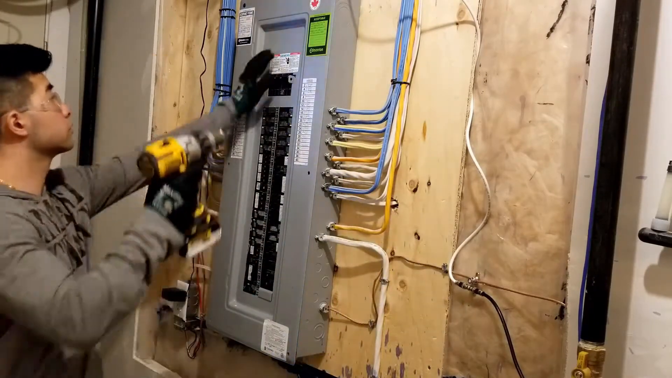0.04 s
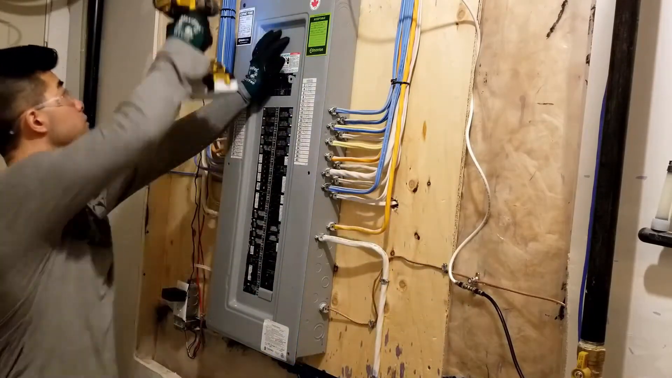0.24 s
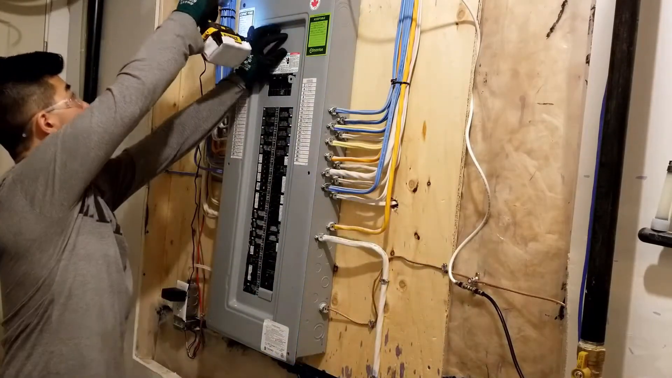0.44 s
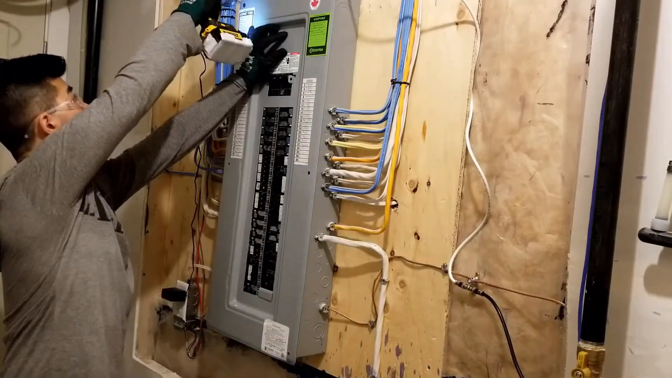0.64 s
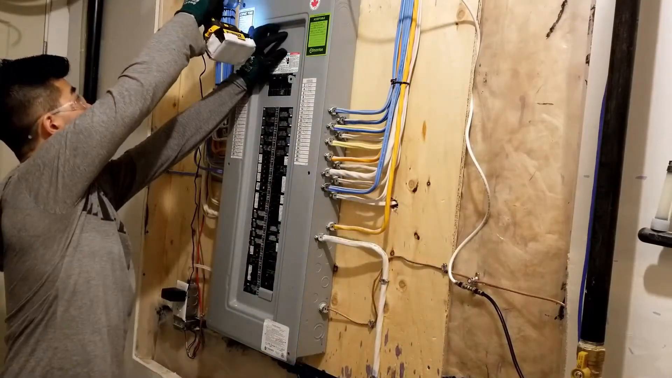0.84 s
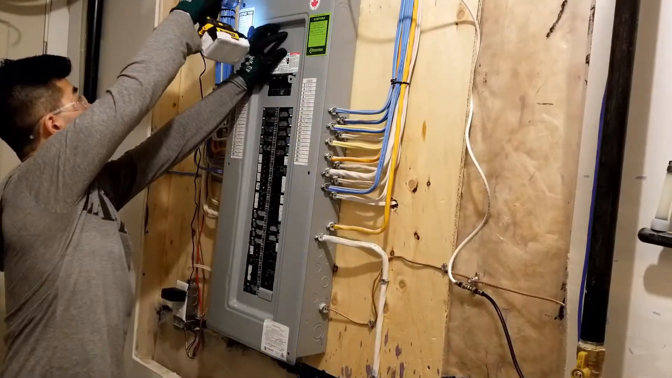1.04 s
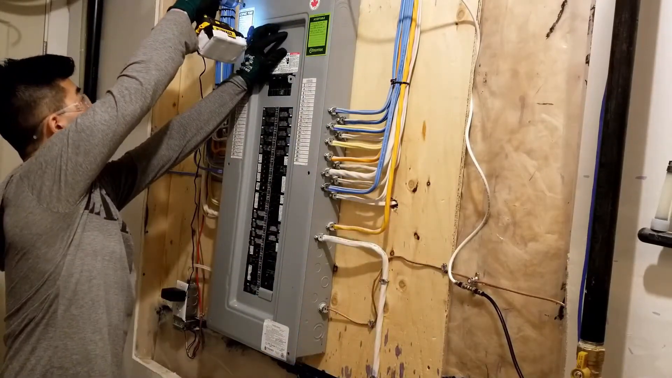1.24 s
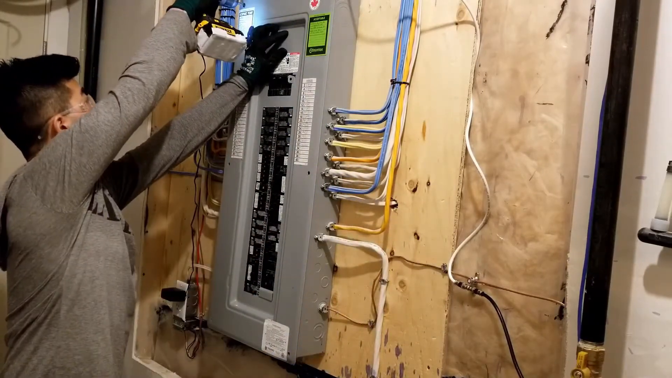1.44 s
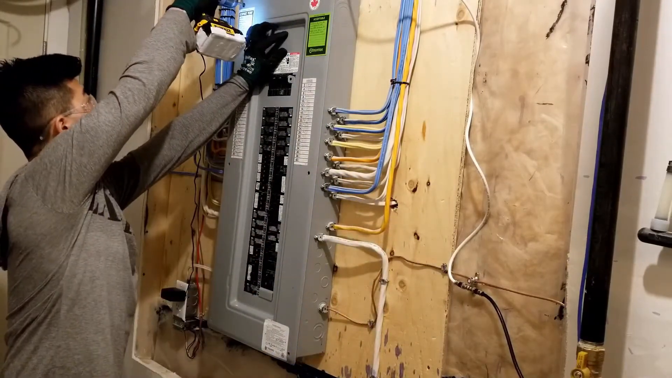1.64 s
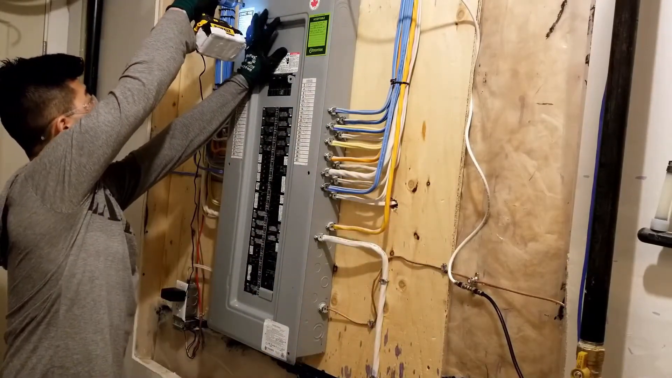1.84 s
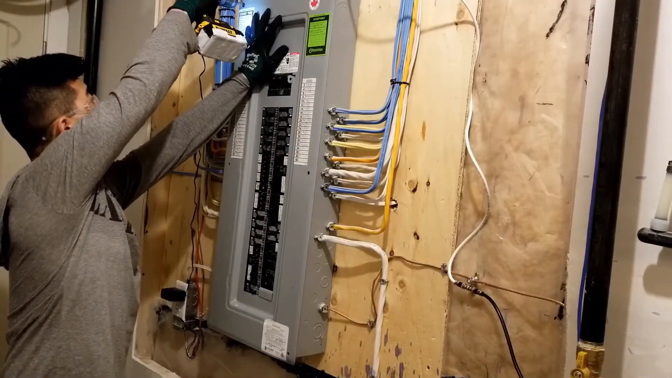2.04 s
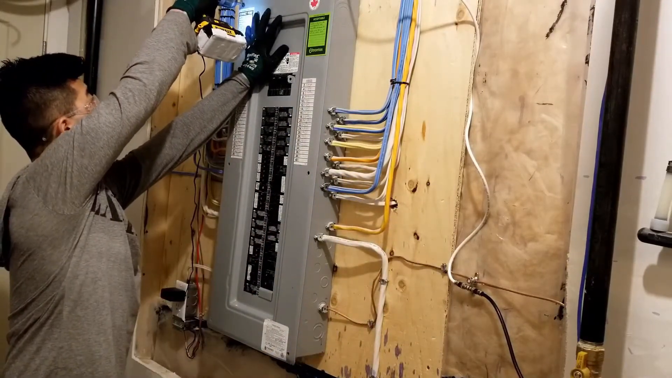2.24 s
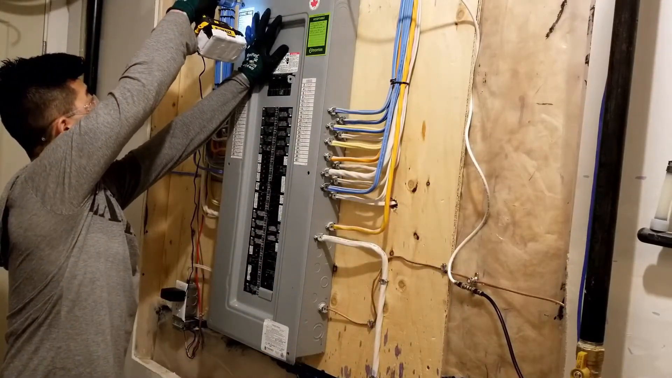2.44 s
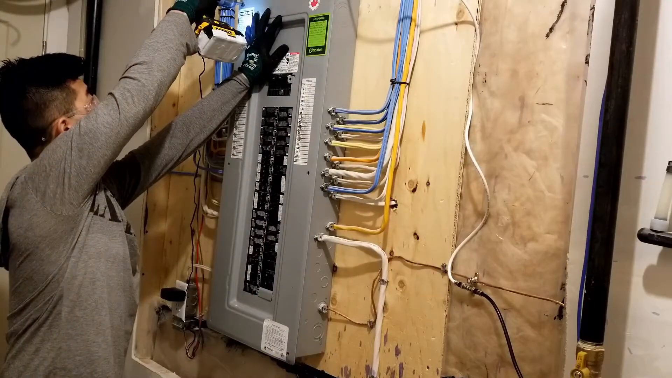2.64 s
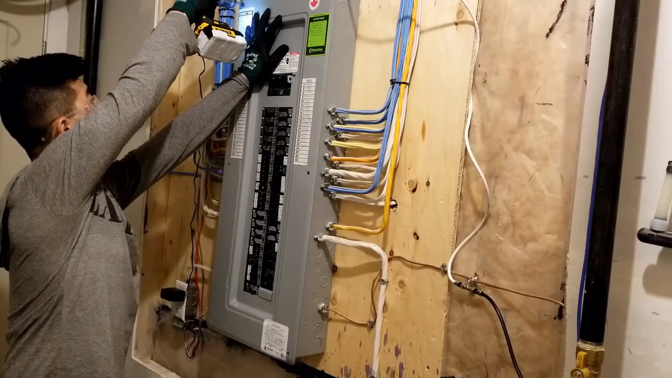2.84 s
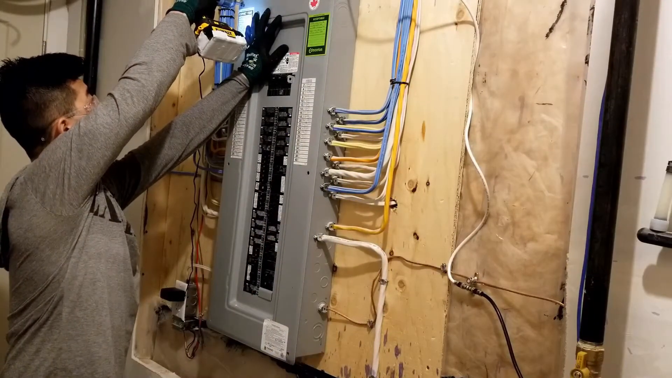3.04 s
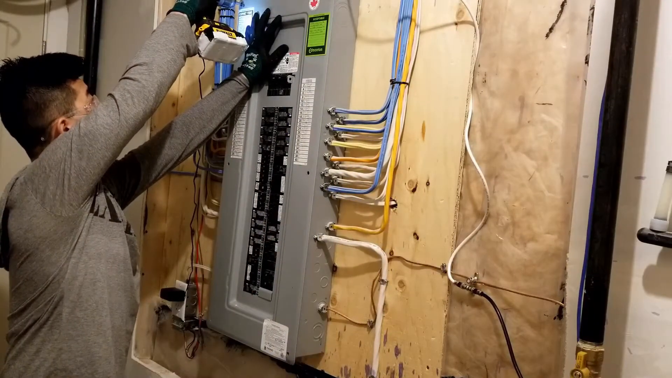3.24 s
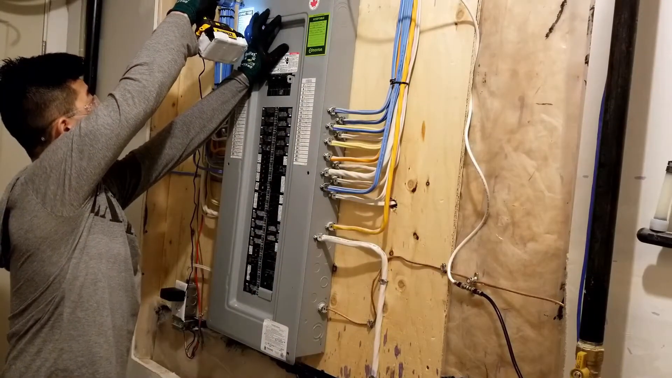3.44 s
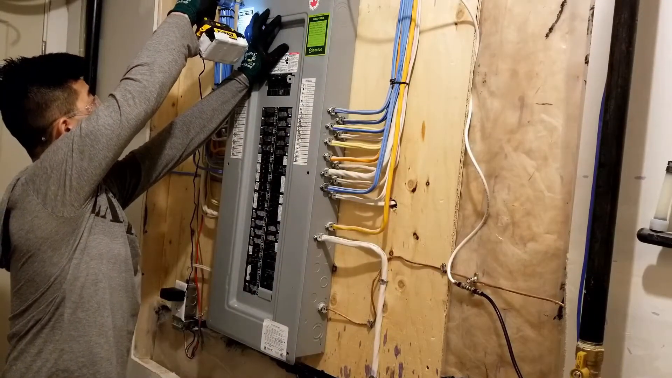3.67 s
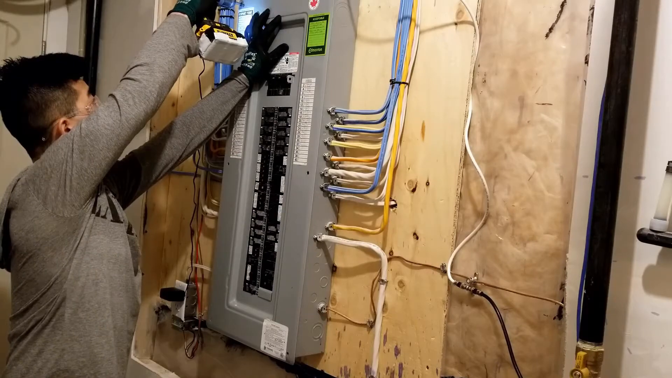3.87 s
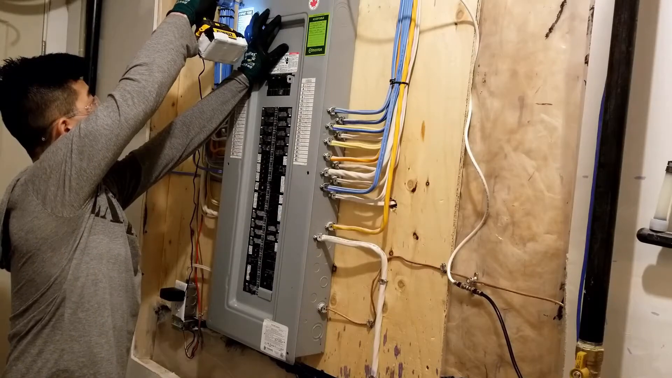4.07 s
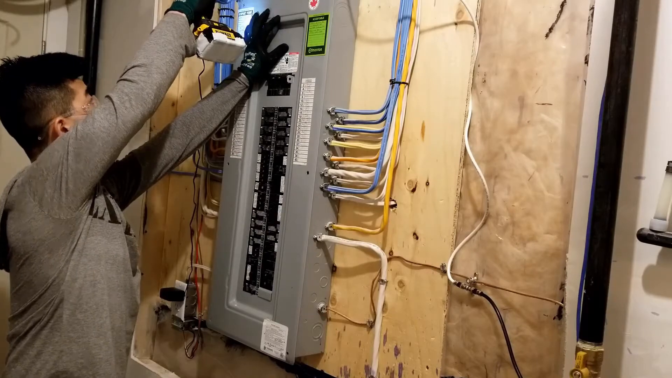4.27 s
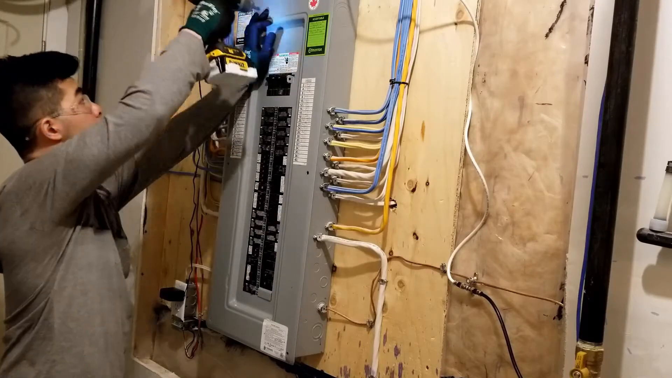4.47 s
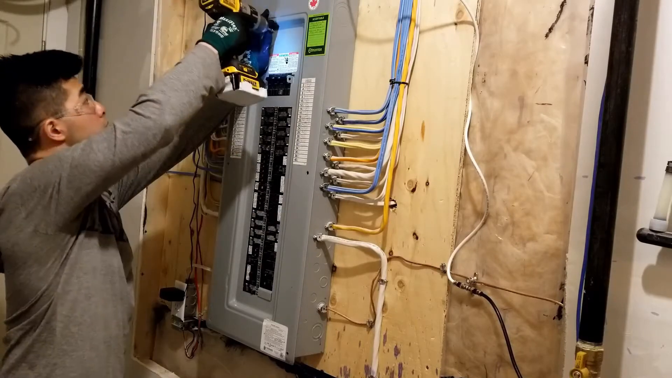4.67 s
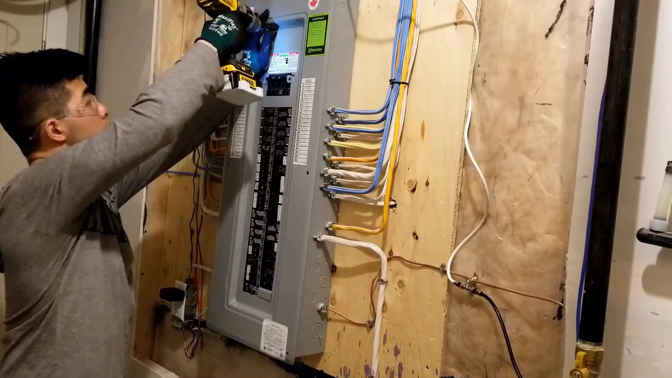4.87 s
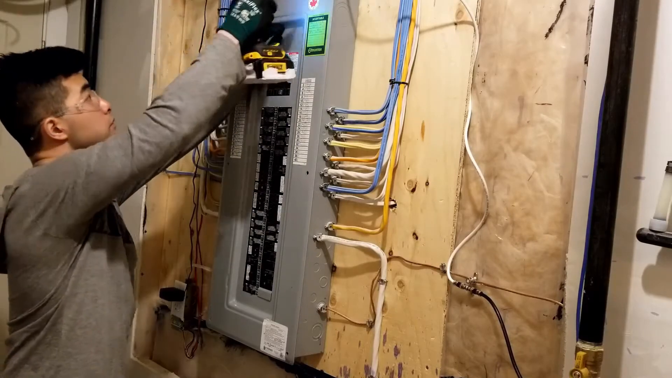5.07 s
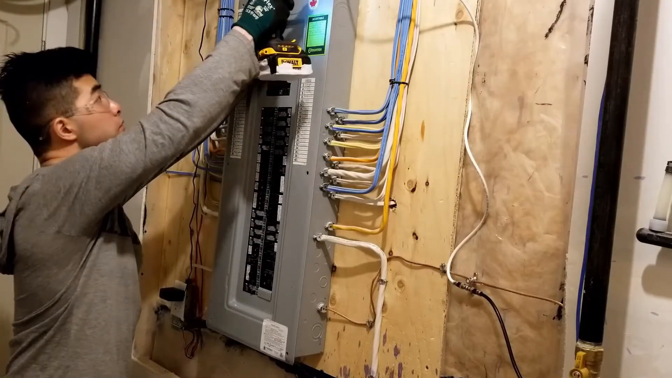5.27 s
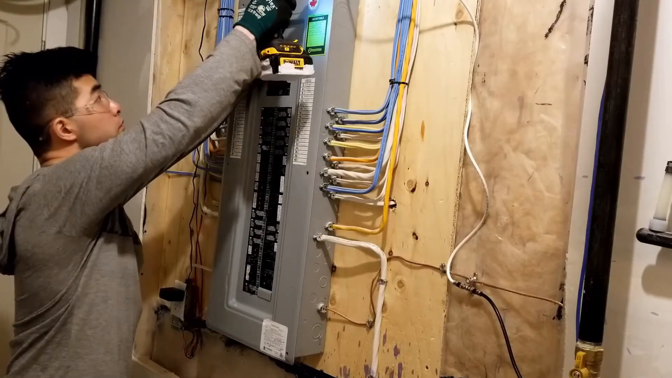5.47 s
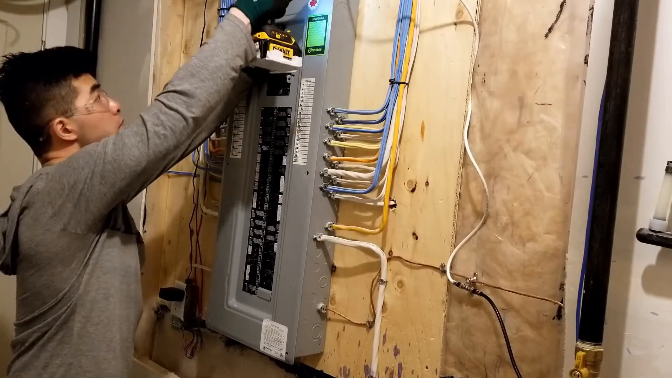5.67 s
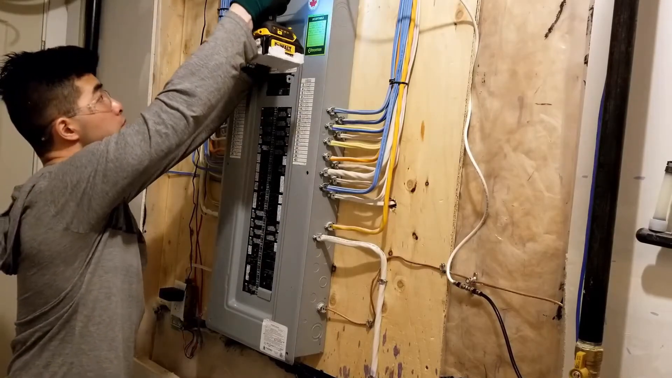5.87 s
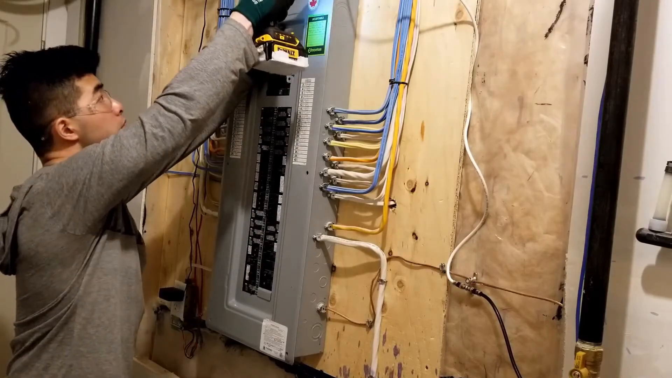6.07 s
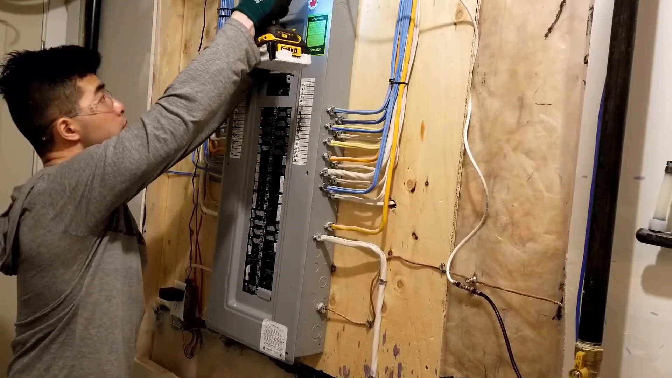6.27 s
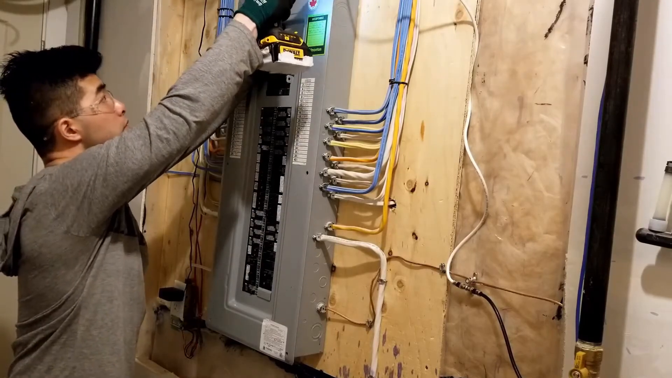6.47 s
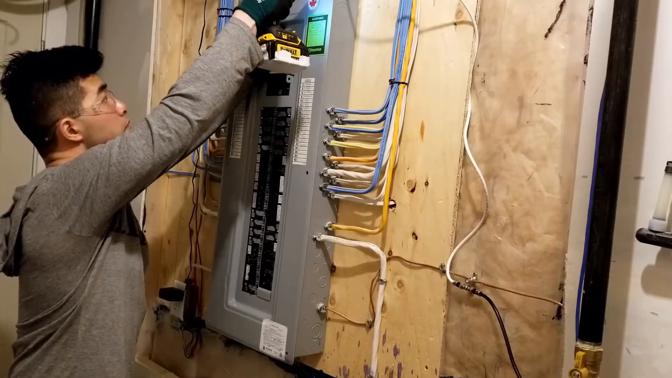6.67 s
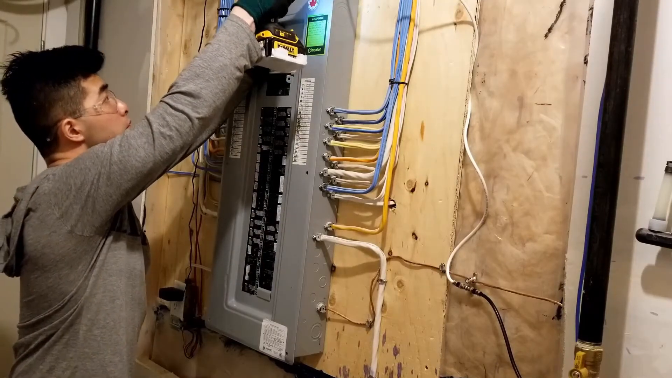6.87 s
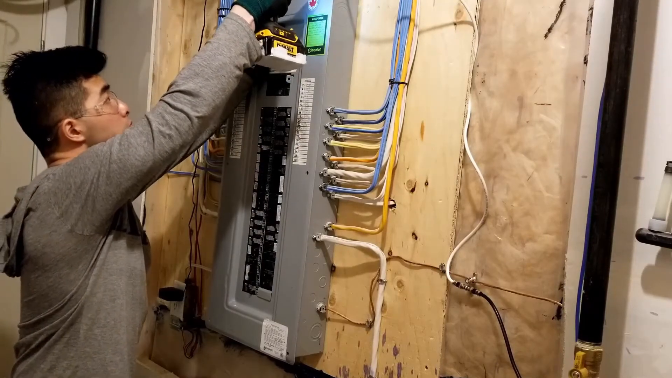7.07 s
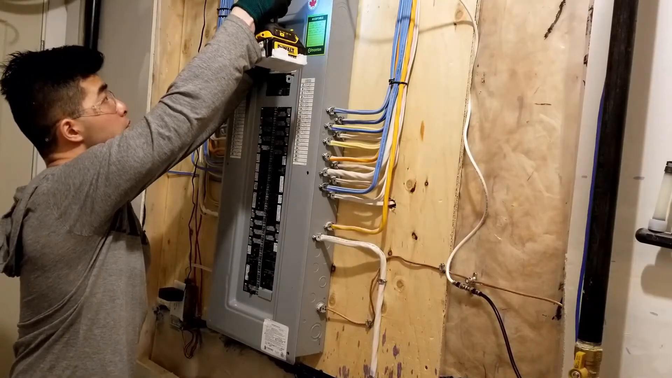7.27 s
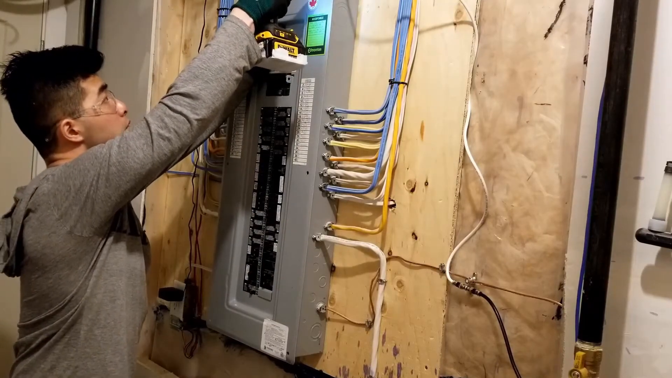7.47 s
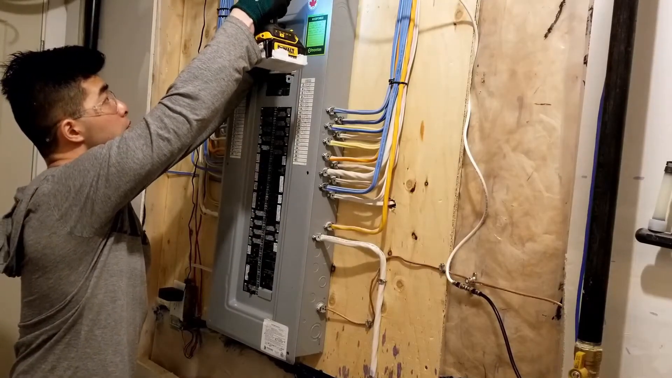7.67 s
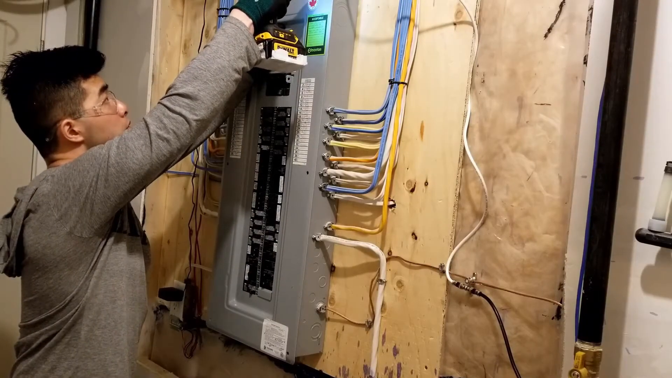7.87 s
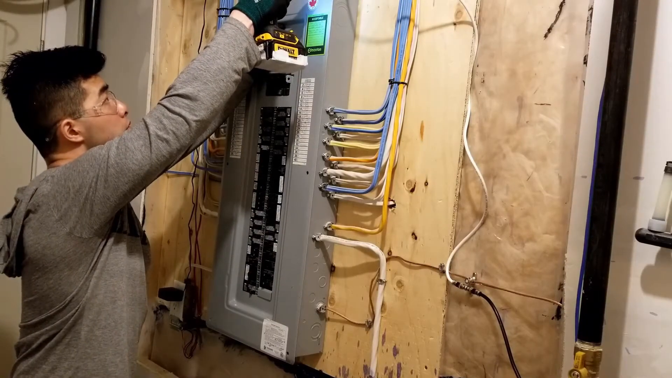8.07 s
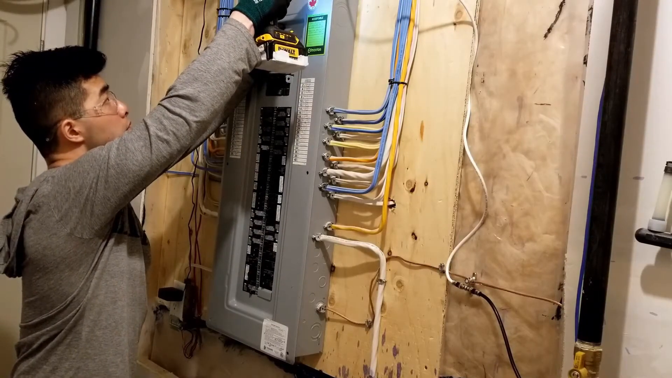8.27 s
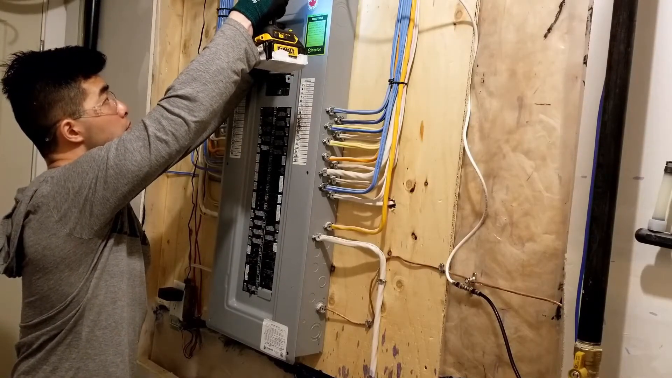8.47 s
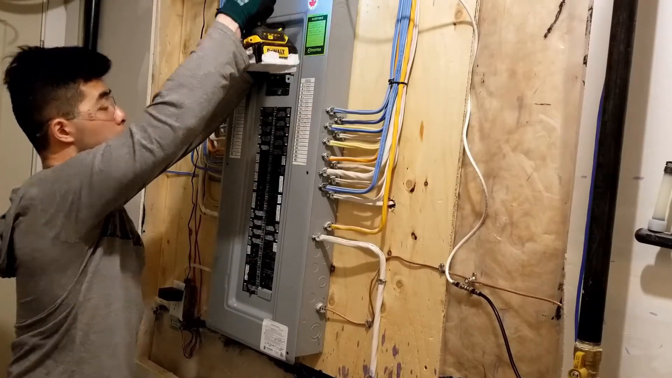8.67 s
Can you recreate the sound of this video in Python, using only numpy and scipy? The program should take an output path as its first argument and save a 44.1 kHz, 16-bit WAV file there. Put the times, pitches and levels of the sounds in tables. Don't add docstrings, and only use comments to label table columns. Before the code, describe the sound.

A cordless drill whirs in two long runs and three short blips against a sheet-metal panel cover, with knocks, rattles and soft footfalls indoors.

```python
import sys
import numpy as np
from scipy import signal
from scipy.fft import rfft, irfft, next_fast_len
from scipy.io import wavfile
from scipy.ndimage import uniform_filter1d

SR = 44100
rng = np.random.default_rng(int(sys.argv[2]) if len(sys.argv) > 2 else 0)


def decibels_to_gain(level_db):
    exponent = np.asarray(level_db, float) / 20
    return 10 ** exponent


def wav_out(sig):
    wavfile.write(sys.argv[1], SR, np.round(np.clip(np.atleast_2d(sig).T, -1, 1) * 32767).astype(np.int16))


N = 384111


def evened(x):
    return x / np.sqrt(np.mean(x ** 2) + 1e-20)


def read(points, hz):
    f, value = np.transpose(points)
    return np.interp(np.log(hz + 1), np.log(f + 1), value)


def add(mix, s, sound):
    part = mix[:, round(s * SR):][:, :sound.shape[1]]
    part += sound[:, :part.shape[1]]


def pair(size):
    likeness = 0.018
    a, b = rng.standard_normal((2, size))
    return np.array([a, likeness * a + np.sqrt(1 - likeness ** 2) * b])


def wander(size, hz):
    return evened(signal.lfilter(*signal.butter(2, hz, fs=SR), rng.standard_normal(size)))


def shape(x, gain):
    size = next_fast_len(x.shape[-1], True)
    spectrum = rfft(x, size) * gain(np.fft.rfftfreq(size, 1 / SR))
    return irfft(spectrum, size)[..., :x.shape[-1]]


def colour(x, spectrum):
    return evened(shape(x, lambda hz: decibels_to_gain(read(spectrum, hz))))


def ring(x, hz, width):
    return evened(shape(x, lambda f: 1 / (1 + (2 * (f - hz) / width) ** 2)))


def through(x, modes):
    return shape(x, lambda hz: sum(decibels_to_gain(db) / (1 + (2 * (hz - f) / w) ** 2) for f, w, db in modes))


def resonate(x, hz, width):
    turn = np.exp(2j * np.pi * np.cumsum(hz * np.ones(x.shape[-1])) / SR)
    r = np.exp(-np.pi * width / SR)
    low = signal.lfilter([1], np.convolve([1, -r], [1, -r]), x / turn)
    return evened((turn * low).real)


def whine(hz, width, clean=0.54):
    turn = 2 * np.pi * (np.cumsum(hz) / SR + rng.random((2, 1)) + 0.12 * wander(len(hz), 25))
    tone = np.sqrt(2) * np.cos(turn)
    return clean * tone + np.sqrt(1 - clean ** 2) * resonate(pair(len(hz)), hz, width)


def burst(t, t60, rise):
    u = t / max(t60, .03)
    return (1 - np.exp(-u / rise)) * decibels_to_gain(-60 * u ** 1.18)


# (frequency [Hz], level [dB per Hz])
FLOOR = [(12, -31), (20, -8), (85, -4), (176, -11), (254, -13.5), (570, -18), (891, -19), (1020, -20),
         (3130, -23), (5950, -31), (7230, -28.5), (8550, -39), (11600, -18.5), (13700, -18), (15800, -18.5)]


def floor():
    return decibels_to_gain(-75.5 + 5.5 + 1.0 * wander(N, 0.97)) * colour(pair(N), FLOOR)


# (time [s], level [dB])
SLEEVE = [(0, -72), (.1, -70.5), (.22, -71), (.3, -59), (.4, -65), (.55, -71), (.62, -76), (.8, -83)]
# (frequency [Hz], level [dB per Hz])
CLOTH = [(880, -39), (1500, -1), (1860, -18), (2060, -8), (4480, -6), (6770, 2), (8750, -5.5), (12500, 2.5),
         (15800, -1.5)]


def sleeve():
    level_db = np.interp(np.arange(N) / SR, *np.transpose(SLEEVE)) + 2.0 * wander(N, 28)
    return decibels_to_gain([[2.5], [-2.5]]) * decibels_to_gain(level_db) * colour(pair(N), CLOTH)


# (frequency [Hz], time to fall 60 dB [s])
ROOM = [(200, 0.26), (1000, 0.19), (4000, 0.22), (14000, 0.1)]


def room(x):
    hz, t, z = signal.stft(rng.standard_normal((2, SR // 2)), SR, nperseg=256)
    fall = decibels_to_gain(-60 * t / read(ROOM, hz)[:, None])
    tail = signal.istft(z * fall, SR, nperseg=256)[1]
    return signal.fftconvolve(x[::-1], tail / np.linalg.norm(tail[0]), axes=1)[:, :N]


# (time [s], level [dB], pitch [Hz])
STEPS = [(0.329, -53, 74), (0.621, -53, 48), (3.091, -54, 167), (3.35, -55, 109.1), (3.643, -54, 128.9),
         (3.922, -43.5, 165), (4.07, -63, 148.7), (4.201, -40.5, 94.5), (4.48, -51, 93.4), (4.57, -63, 55),
         (4.769, -50.5, 40), (4.818, -48, 119), (4.958, -67, 115), (5.057, -49.5, 48), (5.35, -51, 53),
         (5.408, -57, 40), (5.658, -46.5, 187), (7.267, -42, 154), (7.597, -44.5, 189), (8.46, -47, 121),
         (8.538, -41, 193)]
# (time [s], level [dB], pitch [Hz])
LEANS = [(0.061, -59, 84), (1.547, -46, 190), (1.701, -45.5, 238), (2.199, -51, 97), (2.447, -48, 101),
         (2.621, -48, 182.9), (2.808, -48, 98.5), (7.147, -38.5, 101)]
# (frequency [Hz], level [dB per Hz])
JOISTS = [(12, -24), (20, -2.5), (43, -12), (86, -8.5), (132, -0.5), (248, -18), (377, -34), (500, -33),
          (650, -67), (1100, -120)]


def step(s, db, hz, t60):
    t = np.arange(round(.52 * SR)) / SR
    noise = pair(len(t))
    lump = ring(noise, hz, 59.06) + 0.86 * colour(noise, JOISTS)
    sound = decibels_to_gain([[.6], [-.6]]) * burst(t, min(t60, .6), 0.037) * lump
    return max(s - .005, 0), decibels_to_gain(db - 4.0) * sound


# (time [s], blow level [dB], ring pitch [Hz], time to fall 60 dB [s])
TICKS = [(1.349, -30.5, 1050, 0.097), (1.484, -58, 1230, 0.25), (4.447, -61.5, 706, 0.13),
         (5.933, -25, 1293, 0.099), (6.923, -24, 1000, 0.11), (8.643, -31, 1330, 0.087)]
TOUCHES = [(5.098, -73, 221, 0.14), (5.46, -67, 525, 0.1), (5.766, -65.5, 320, 0.21)]
KNOCKS = [(0.389, -51.5, 396, 0.29), (0.5, -50.5, 270, 0.12), (0.632, -47.5, 400, 0.18),
          (1.04, -40.5, 260, 0.051), (3.417, -34.5, 420, 0.25), (4.586, -51.5, 382, 0.16),
          (6.039, -30, 444, 0.26), (6.065, -32.5, 600, 0.18), (6.111, -15, 520, 0.13),
          (8.539, -39.5, 223, 0.23)]
THUMPS = [(0.281, -58.5, 410, 0.42), (0.971, -33.5, 420, 0.16), (1.316, -27.5, 260, 0.16),
          (1.375, -35.5, 276, 0.091), (8.47, -43.5, 240, 0.28)]
BUMPS = [(5.505, -33, 497, 0.13), (5.562, -38.5, 505, 0.17), (5.597, -31.5, 520, 0.12),
         (6.147, -35, 417, 0.31), (6.541, -29.5, 450, 0.15), (6.62, -30, 430, 0.15)]
JOLTS = [(1.893, -31.5, 345, 0.26), (1.964, -28, 378, 0.28), (2.029, -32, 377, 0.29),
         (3.475, -35, 262.1, 0.12), (6.086, -28, 690, 0.16), (6.82, -33.5, 436, 0.4),
         (6.866, -23, 480, 0.12), (7.17, -37.5, 340, 0.78), (7.28, -35, 400, 0.21)]
GRAZES = [(0.164, -45, 1410, 0.095), (5.1, -60, 1400, 0.093), (5.765, -48.5, 1370, .1)]
HUMS = [(3.468, -33, 259, .16), (3.922, -36.5, 167, .15), (5.785, -35, 446, 0.35), (7.81, -42, 520, 0.24)]
# (contacts, crack [dB], boom [dB], upper modes [dB], ring width [Hz],
# rise [share of the time to fall 60 dB])
CONTACTS = [(TICKS, -3.5, -27, -8.5, 410, 0.018), (TOUCHES, 5.4, 0.1, -9, 210, 0.018),
            (KNOCKS, -12.5, -18.5, -23, 310, 0.038), (THUMPS, -7.5, 1.1, -29, 310, 0.033),
            (BUMPS, -23, -8.5, -12, 200, 0.041), (JOLTS, -13, -21.5, -21, 210, 0.015),
            (GRAZES, -18, -36, -24, 430, 0.033), (HUMS, -34, -37, -30.5, 46.7, 0.061)]
# (frequency [Hz], level [dB per Hz])
THUD = [(60, -19.5), (180, 1.5), (320, -2.5), (500, 4), (750, 1), (1300, -2), (1800, -9.5), (2700, -16),
        (3500, -29.5)]
# (frequency [Hz], level [dB per Hz])
CRACK = [(880, -27.5), (1500, -17.5), (2500, -9), (3030, -14.5), (3790, -13.5), (5750, -17), (7710, -15.5),
         (8400, -54), (9500, -85.5), (12400, -103), (20900, -120)]
# (frequency [Hz], width [Hz], level [dB])
PLATE = [(705, 130, 3), (1400, 150, 11), (1660, 120, 7), (2080, 250, -38.5), (2760, 170, -19.5),
         (3700, 150, -30), (4600, 250, -14), (7300, 900, -23)]
# (frequency [Hz], level [dB], time to fall 60 dB [s])
COVER = [(390, -4, .36), (490, -17, .22)]


def knock(s, db, hz, t60, crack_db, boom_db, plate_db, width, rise):
    t = np.arange(round(.45 * SR)) / SR
    noise = pair(len(t))
    thud = decibels_to_gain(min(0.96 * (db + 26.5), 1.0)) * colour(noise, THUD)
    plate = decibels_to_gain(plate_db - 25 * t / t60) * evened(through(noise, PLATE))
    crack = decibels_to_gain(crack_db) * colour(noise, CRACK)
    boom = decibels_to_gain(boom_db) * (ring(noise, 152, 270) + 1.25 * colour(noise, JOISTS))
    blow = burst(t, t60, max(rise, .005)) * (ring(noise, hz, width) + thud + plate + crack + boom)
    phase = noise[:, :1]
    notes = sum(decibels_to_gain(d + 1.0 * (db + 10.5) - 60 * t / long) * np.sin(2 * np.pi * (f * t + phase))
                for f, d, long in COVER)
    notes = notes * (1 - np.exp(-t / 0.0081))
    return s, decibels_to_gain(db - 9.5) * decibels_to_gain([[1.5], [-1.5]]) * (blow + notes)


# (time [s], level [dB], time to fall 60 dB [s])
RATTLES = [(0.0307, -56, 0.12), (0.3228, -34, 0.071), (0.344, -38, 0.079), (1.317, -24.5, 0.081),
           (1.3494, -55, 0.17), (4.359, -40, 0.046), (4.445, -61, 0.16), (4.58, -71, 0.1),
           (4.947, -59, 0.1), (5.6004, -49.5, 0.14), (5.718, -60.5, 0.4), (5.9325, -26, 0.11),
           (6.06, -47, 0.26), (6.084, -38, 0.28), (6.112, -18.5, 0.11), (6.1383, -34.5, 0.061),
           (6.8675, -19, 0.14), (6.929, -24, 0.056), (7.1543, -16, 0.23), (7.299, -15, 0.24),
           (8.1, -39, 0.077), (8.6383, -52, 0.11)]
# (frequency [Hz], level [dB per Hz])
CHUCK = [(590, -26), (1000, -15.5), (2190, -12), (2830, -4), (3250, -16), (4140, -8.5), (5210, -7.5),
         (6880, -4), (8370, -14.5), (15800, -11.5)]


def rattle(s, db, t60):
    t = np.arange(round(.3 * SR)) / SR
    grains = decibels_to_gain(2.8 * np.clip(wander(len(t), 490), -2, 2)) * pair(len(t))
    puff = burst(t, t60, 0.03) * colour(grains, CHUCK)
    return s - .002, decibels_to_gain(db - 6.0) * decibels_to_gain([[1.5], [-1.5]]) * puff


# (time [s], pitch [Hz], level [dB])
SQUEALS = [
    [(5.8, 3330, -61), (5.83, 3400, -48), (5.88, 3600, -46), (5.92, 3480, -48), (5.94, 3400, -64)],
    [(7.28, 3170, -50), (7.31, 3152, -37), (7.33, 3100, -39), (7.35, 3100, -55)],
    [(7.89, 1308, -81), (7.93, 1311, -65), (8.03, 1330, -64), (8.07, 1314, -74)],
    [(8.13, 542, -72), (8.17, 552, -51.5), (8.24, 548, -68), (8.3, 545, -83)],
]


def squeal(rows):
    s, hz, db = np.transpose(rows)
    t = np.arange(s[0], s[-1], 1 / SR)
    level = decibels_to_gain(np.interp(t, s, db) + [[1.5], [-1.5]])
    return s[0], level * whine(np.interp(t, s, hz), 83, clean=0.58)


# (distance [multiple of speed], width [Hz], level [dB])
SIDEBANDS = [(-1, 420, -4), (1, 940, -4.5), (-1.9, 460, -17.5), (1.9, 500, -14), (-.5, 530, -13),
             (3.1, 450, -12)]
# (frequency [Hz], level [dB])
VENTS = [(11000, -10), (12200, 0), (13500, 0), (15000, 0), (15500, 4), (16000, 0)]


def whistle(speed, throb):
    size = len(speed)
    bands = 0
    for k, width, db in SIDEBANDS:
        hz = 14104 + k * speed * (1 + 0.04 * wander(size, 250))
        bands = bands + decibels_to_gain(db) * resonate(pair(size), hz, width)
    return colour(throb * (evened(bands) + decibels_to_gain(-12.0) * pair(size)), VENTS)


# (pitch [multiple of speed], width [Hz], level at top speed [dB], slope [dB per octave of speed])
GEARS = [(1.27, 120, -6, 16), (1.485, 60, -1.5, 18), (1.675, 70, -4, 22), (2.02, 120, -23, -8),
         (2.65, 130, -23, -10), (2.9, 90, -4, -1)]
# (frequency [Hz], width [Hz], level [dB])
GEARBOX = [(520, 130, -17), (946, 156, -6), (1303, 270, -7.5), (2120, 220, -3.5), (2253, 110, 7.5),
           (2610, 180, 1), (2790, 49, -1.5), (2970, 390, -3), (3250, 97, 0), (3400, 260, -1),
           (5340, 490, -6.5)]
# (speed [Hz], level [dB])
GEAR_SONG = [(120, -10.5), (280, -10), (440, -13.5), (490, -1.5), (780, -28), (900, -3), (1230, -9),
             (1330, 1), (1550, -2.5), (1700, 3), (1900, -1)]


def gears(hz, speed):
    lines = 0
    for k, width, db, slope in GEARS:
        level_db = db + slope * np.log2(hz / 1900) + 1.0 * wander(len(hz), 12)
        lines = lines + decibels_to_gain(level_db) * whine(k * speed, width)
    spin_up = np.maximum(uniform_filter1d(np.gradient(np.log(hz)) * SR, size=200), 0)
    return decibels_to_gain(read(GEAR_SONG, hz) - 0.2 * spin_up) * through(lines, GEARBOX)


def patchy(x, depth_db):
    z = signal.stft(x, nperseg=512)[2]
    chance = uniform_filter1d(rng.standard_normal(z.shape), size=5, axis=1)
    patches = evened(uniform_filter1d(chance, size=7, axis=2))
    return evened(signal.istft(z * decibels_to_gain(depth_db * patches), nperseg=512)[1][:, :x.shape[1]])


# (frequency [Hz], level [dB per Hz])
GRIT = [(290, -44), (500, -12.5), (1160, -5), (3420, 4.5), (4560, -3.5), (7780, 1), (9530, -7.5),
        (10400, -1), (12200, -5.5), (14300, -3), (15800, -1.5)]
# (frequency [Hz], width [Hz], level [dB], slope [dB per octave below the easy pace])
HOUSING = [(683, 140, -32.5, -6), (1050, 460, -34, -12), (1356, 160, -25.5, -2.5), (3400, 230, -16, 1),
           (5677, 110, -16.5, 1.5), (6180, 460, -25.5, -4), (7910, 230, -12.5, -1.5),
           (10650, 550, -20.5, -6)]


def grit(octaves, grip_db):
    size = len(octaves)
    spark = decibels_to_gain(0.9 * wander(size, 580))
    hiss = spark * pair(size)
    rings = 0
    for hz, width, db, slope in HOUSING:
        level_db = db + grip_db + slope * np.minimum(octaves, 0) + 3.9 * wander(size, 9.3)
        rings = rings + decibels_to_gain(level_db) * ring(hiss, hz, width)
    return patchy(colour(hiss, GRIT) + rings, 2.0)


# (frequency [Hz], level [dB per Hz])
SHAKE = [(35, -52.5), (60, -8), (144, -3.5), (176, -3.5), (250, -7.5), (330, -9.5), (546, -5), (735, -7),
         (1500, -12), (1950, -56.5), (3300, -120)]


def shaken_cover(size):
    return decibels_to_gain(2.13 * wander(size, 9.7)) * colour(pair(size), SHAKE)


# (time [s], whistle level [dB], motor speed [Hz])
BLIPS = [
    [(1.232, -60, 120), (1.252, -45, 125), (1.3, -41.5, 135), (1.36, -34, 144), (1.385, -62, 149),
     (1.42, -67, 152)],
    [(5.77, -70, 111), (5.797, -44, 164), (5.85, -32.5, 284), (5.91, -28.5, 423), (5.95, -36, 428),
     (5.99, -84, 398)],
    [(6.78, -68, 189), (6.803, -41.5, 290), (6.85, -26.5, 610), (6.9, -28, 460), (6.94, -31.5, 296),
     (6.985, -78, 200)],
]
BREAK_FREE = [(1.525, -63, 172), (1.556, -38, 179), (1.621, -35, 203), (1.749, -34.5, 250.6),
              (1.96, -30, 382), (2.05, -27.5, 447), (2.3, -28, 490.3), (3.1, -28, 481), (3.27, -30, 465.4)]
FEATHER = [(3.419, -37.5, 274), (3.6, -31.5, 273), (3.66, -41.5, 211), (3.93, -39, 244.7),
           (4.08, -30, 437.6), (4.17, -35, 283.3), (4.23, -45, 203), (4.365, -47, 113.4), (4.395, -59, 110)]
FULL_SQUEEZE = [(7.045, -63, 448), (7.075, -32.5, 621.4), (7.1, -22.5, 864), (7.14, -20.5, 1450),
                (7.17, -19, 1900), (7.22, -22.5, 1903), (7.285, -19.5, 1886), (7.31, -22, 1778),
                (7.34, -25, 1706)]
COAST = [(7.4, -25, 1500), (7.5, -25, 1246), (7.555, -29, 1120), (7.601, -29.5, 948), (7.634, -29.5, 896),
         (7.68, -31.5, 757)]
CREEP = [(7.75, -33, 515), (7.8, -38, 315), (7.851, -42, 186.6), (7.901, -39, 195.5), (8.15, -40.5, 196),
         (8.45, -46, 162.2), (8.601, -46.5, 134), (8.659, -40, 114), (8.695, -91, 110)]
SHAKE_DB = [-45.5, -57.5, -56.5, -52, -58]
STRAIN_DB = [0, 1.1, 2, -0.61, -1.78]
GRIP_DB = [-1, -2, -5, -2.1, -6]
# (frequency [Hz], left over right [dB])
TOOL_SIDE = [(60, -5), (180, 2), (550, 3.5), (1650, 0.5), (4970, 5), (15000, 5.5)]


def pull(rows, cover_db, strain_db, grip_db):
    cruise_hz, cruise_db = 490, -29
    s, *columns = np.transpose(rows)
    t = np.arange(s[0], s[-1], 1 / SR)
    whistle_db, hz = (np.interp(t, s, c) for c in columns)
    octaves = np.log2(hz / cruise_hz)

    speed = hz + 20 * np.minimum(cruise_hz / hz, 1) * wander(len(t), 14.46)
    shaft = np.sin(2 * np.pi * np.cumsum(speed / 8.5) / SR)
    throb = decibels_to_gain(2.2 * shaft + 1.1 * np.clip(wander(len(t), 21), -2, 2))

    grit_db = -6 + strain_db - 0.31 * (whistle_db - cruise_db) + 3 * np.maximum(octaves, 0)
    grit_db = np.minimum(grit_db, 0.5)
    tight_db = 9 * np.exp(-(t - s[0]) / 0.81)
    shake_db = cover_db + 7 * octaves + tight_db - np.maximum(whistle_db, -42)

    body = grit(octaves, grip_db) + gears(hz, speed)
    body = shape(body, lambda f: decibels_to_gain([[.5], [-.5]] * read(TOOL_SIDE, f)))
    sound = decibels_to_gain([[2.6], [-2.6]]) * whistle(speed, throb)
    sound = sound + decibels_to_gain([[.6], [-.6]]) * decibels_to_gain(grit_db) * body
    sound = sound + decibels_to_gain([[.3], [-.3]]) * decibels_to_gain(shake_db) * shaken_cover(len(t))
    return s[0], decibels_to_gain(whistle_db - 1) * sound * signal.windows.tukey(len(t), 0.013 * SR / len(t))


def scene():
    near = np.zeros((2, N))
    for feet, t60 in ((STEPS, 0.27), (LEANS, 0.62)):
        for row in feet:
            add(near, *step(*row, t60))
    for contacts, *kind in CONTACTS:
        for row in contacts:
            add(near, *knock(*row, *kind))
    for row in RATTLES:
        add(near, *rattle(*row))
    for rows in SQUEALS:
        add(near, *squeal(rows))
    pulls = BLIPS + [BREAK_FREE + FEATHER, FULL_SQUEEZE + COAST + CREEP]
    for gesture in zip(pulls, SHAKE_DB, STRAIN_DB, GRIP_DB):
        add(near, *pull(*gesture))
    return near + decibels_to_gain(-12.5) * room(near) + floor() + sleeve()


def top_cut(x):
    return signal.sosfilt(signal.butter(12, 16820, fs=SR, output="sos"), x)


def record(dry):
    edge = signal.firwin(511, 15680, window=("kaiser", 9), fs=SR)
    mix = signal.oaconvolve(dry, edge[None], "same")
    return top_cut(mix)


dry = scene()
out = record(dry)
wav_out(out)
```